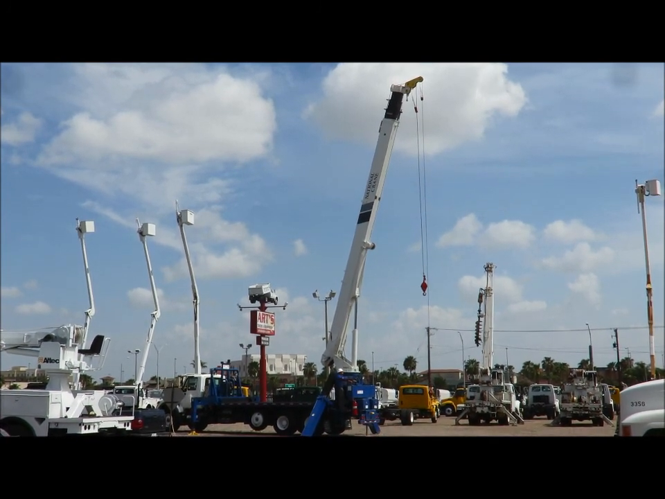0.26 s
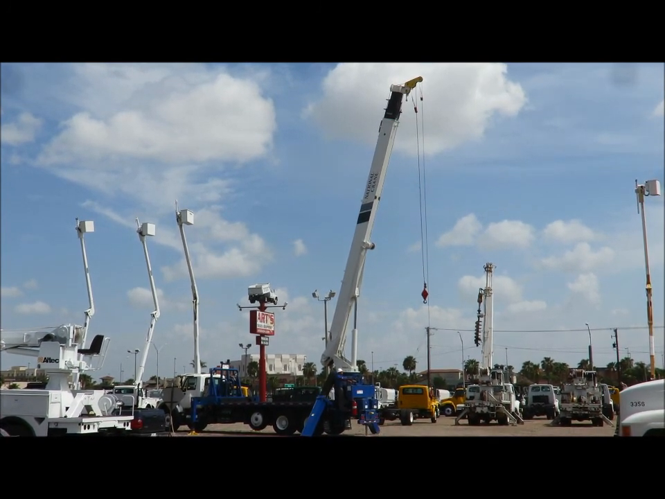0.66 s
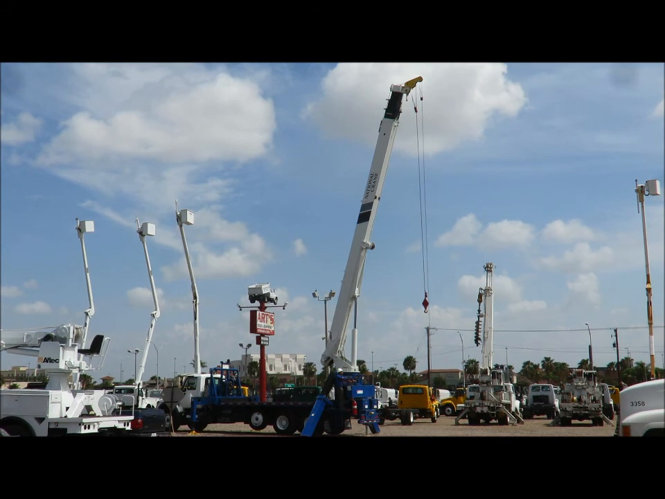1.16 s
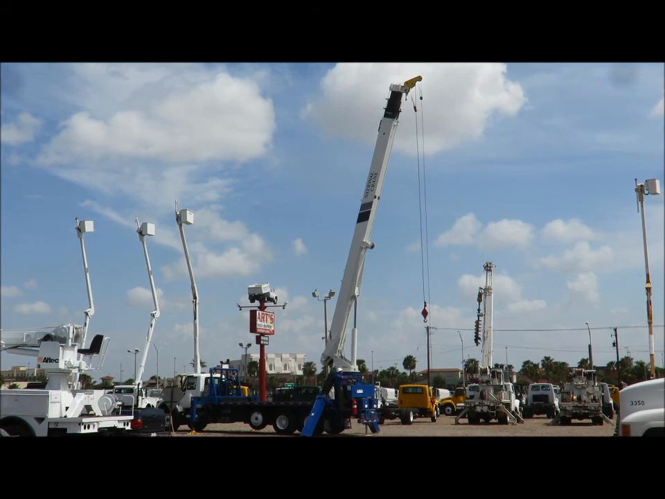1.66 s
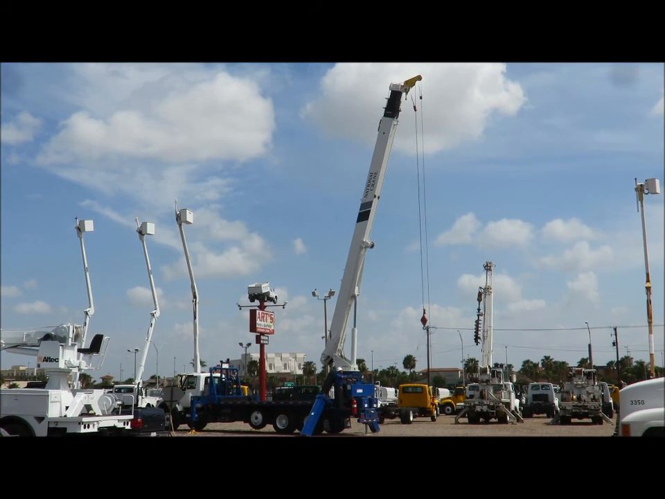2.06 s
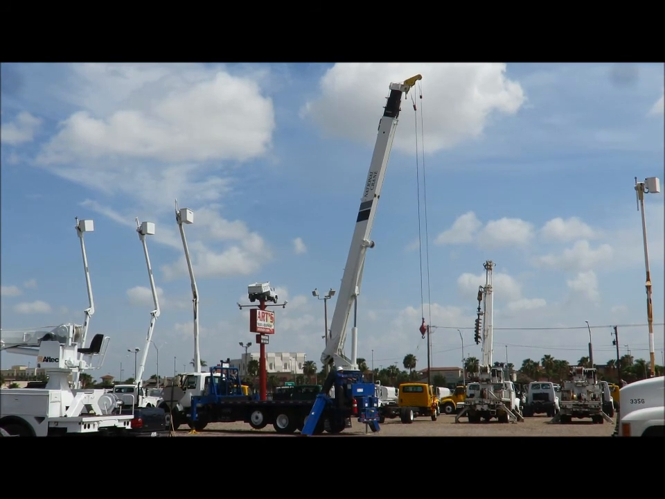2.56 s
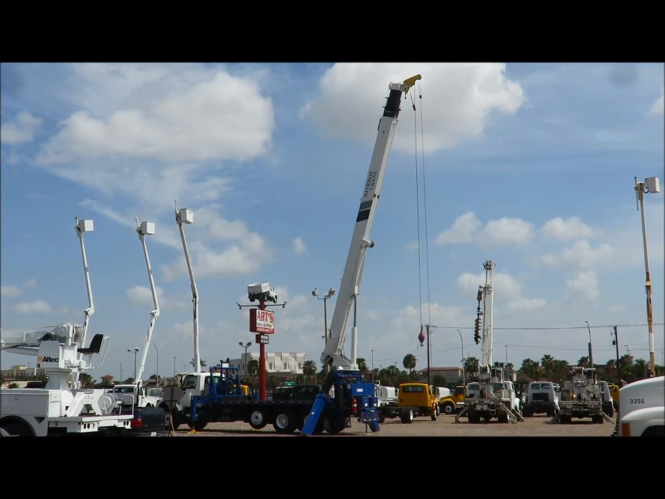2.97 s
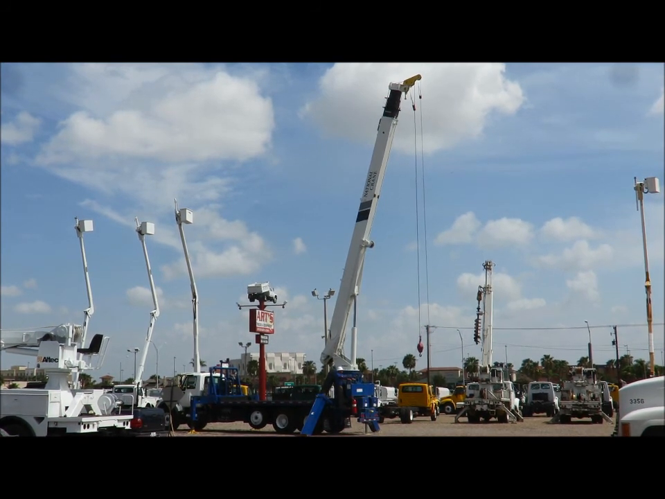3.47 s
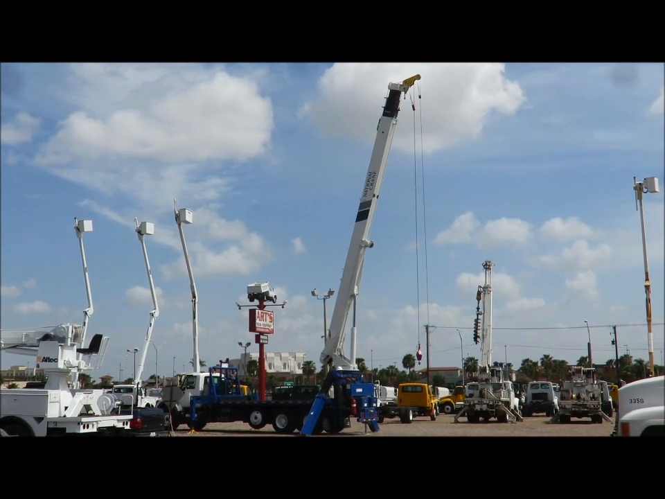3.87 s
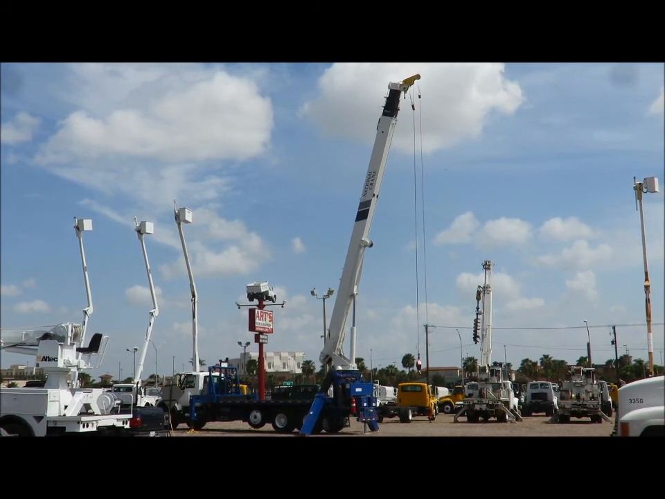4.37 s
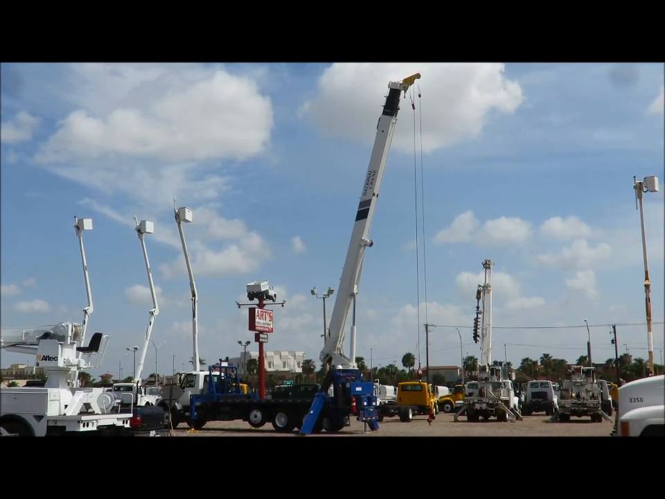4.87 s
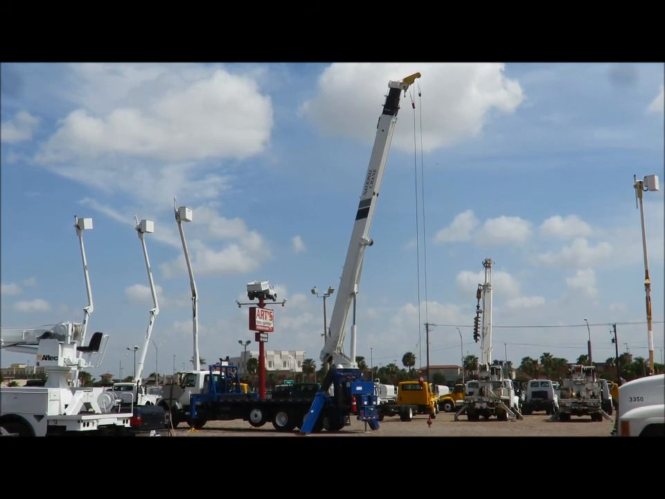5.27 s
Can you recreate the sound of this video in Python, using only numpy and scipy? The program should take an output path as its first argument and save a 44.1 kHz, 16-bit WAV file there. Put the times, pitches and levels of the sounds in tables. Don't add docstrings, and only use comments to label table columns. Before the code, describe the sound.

In an open yard, a crane truck runs at constant working speed: a hard, reedy pump whine, a lower winch-motor hum, thin gear whine and broad engine and fan roar. Wind thumps the bare stereo microphone at the start, calms in the middle, then returns with sharper knocks and rumble near the end.

```python
import sys
import numpy as np
from scipy import signal
from scipy.fft import rfft, irfft, next_fast_len
from scipy.io import wavfile
from scipy.ndimage import uniform_filter1d, map_coordinates

SR = 44100
rng = np.random.default_rng(int(sys.argv[2]) if len(sys.argv) > 2 else 0)


def generate_wav(signal):
    frames = np.transpose(np.atleast_2d(signal))
    scaled = np.clip(frames, -1, 1) * 32767
    pcm = np.round(scaled).astype(np.int16)
    wavfile.write(sys.argv[1], SR, pcm)


def ratio_of_db(decibels):
    return 10 ** (np.asarray(decibels, float) / 20)


N = 243255

# multiple, level/dB, shimmer/dB, phase blur/rad
PUMP_LOUD = [(7, -31, 0.65, 0.264), (13, -30, 0.14, 0.63), (21, -37, 1.5, .6), (14, -39, 1, 0.64)]
# multiple, level/dB
PUMP_WEAK = [(6, -46), (8, -54), (15, -57.5), (16, -49.5), (19, -50), (20, -48), (23, -74), (26, -49),
             (28, -48.5), (30, -50.5), (35, -50), (41, -48.5), (42, -58)]
# t/s, length/s, depth/dB, centre f/Hz
PUMP_FADES = [(0, 0.042, -6, 1600), (0.303, 0.64, -4, 1270), (.24, .05, -2.5, 684), (.7, 0.04, -22, 1120),
              (1.06, 0.1, -4, 684), (1.26, .05, 0, 2050), (1.357, 0.092, -16, 1110), (2.7, 0.92, -7, 2340),
              (3.9, .1, -1, 2400), (2.88, 0.064, -6, 1190), (4.235, 0.077, -2.5, 684),
              (4.348, 0.15, -9, 1380), (4.695, .1, -3, 684), (5.1, 0.32, -4.5, 1270),
              (5.327, 0.072, -15, 1500), (4.15, 0.091, -0.5, 1400), (5.45, .08, -0.5, 1270)]
# multiple, level/dB against the 13th
WINCH_ORDERS = [(7, -1.5), (13, 0), (14, 1.5), (15, -12), (16, -16), (20, -1.5), (21, -10.5), (22, -27),
                (27, -6), (28, -11), (38, -25)]
# t/s, length/s, depth/dB
WINCH_FADES = [
    (.3, 0.38, -4.5),
    (.92, 0.26, -13),
    (1.7, 0.23, -6),
    (2.8, 0.044, -4),
    (3.4, 0.12, -3),
    (3.708, .06, -15.5),
    (4.077, 0.13, -12),
    (4.81, 0.28, -5),
]
# t/s, length/s, depth/dB
MESH_FADES = [
    (0, 0.11, -6),
    (0.868, 0.16, -6.5),
    (1.616, .12, -6),
    (2.656, 0.12, -5.5),
    (3.1, 0.18, -1.5),
    (3.86, .12, -0.5),
    (4.2, 0.41, -2.5),
    (4.92, .1, -5.5),
    (5.26, .06, -3),
    (5.52, 0.059, 0),
]
# frequency as multiple of the firing rate, level/dB
LOW_TONES = [(2, 2.5), (3, 1), (4, -5), (10.3, -2)]
# t/s, length/s, level/dB
BOOM_SWELLS = [
    (.3, .2, 7.5),
    (1.2, 0.56, -3),
    (1.85, 0.072, 8),
    (2.15, 0.11, -9.5),
    (2.55, 0.29, 5.5),
    (3, .15, 4),
    (3.75, 0.23, 12),
    (4.09, 0.3, 7.5),
    (4.55, .25, 12.5),
    (5.52, 0.24, 14.5),
]
# f/Hz, level/dB (per Hz)
BLOCK_SPECTRUM = [(25, -36), (45, -32), (80, -12), (140, -1.5), (300, -4), (600, -1), (850, -5), (1050, -2),
                  (1205, -5.5), (1300, 0), (1720, -7.5), (2050, -5), (2600, -13.5), (3500, -31)]
# f/Hz, level/dB (per Hz)
FAN_SPECTRUM = [(900, -42), (1600, -9), (2200, -2.5), (3200, -0.5), (4500, -3.5), (6500, -22.5)]
# f/Hz, level/dB (per Hz)
HISS_SPECTRUM = [(2500, -16.5), (4200, -5), (5500, 0), (7500, -2), (10000, -3.5), (12500, -4),
                 (14500, -11.5), (15700, -1.5), (16200, -67)]
# f/Hz, correlation/1
TRUCK_ALIKE = [(100, .998), (500, .988), (1500, .985), (2200, .92), (3000, .84), (6000, .69), (9000, .7),
               (14000, .78)]
# f/Hz, phase/rad
PORT_LEAD = [(100, 0), (1500, .1), (2500, .36), (3500, .7), (5500, 1.4), (7600, 2.05), (10600, 2.9),
             (15000, 3.15)]
# t/s, level/dB
BREEZE = [
    (0, -32.5),
    (.5, -36.5),
    (.75, -41),
    (1.3, -36),
    (2, -45.5),
    (2.7, -40),
    (3.2, -35),
    (4.3, -29),
    (5, -30.5),
    (5.52, -29),
]
# t/s, length/s, level/dB
GUSTS = [(0.135, .1, 10), (0.301, 0.081, 7), (0.436, 0.067, 8.5), (1.001, 0.035, 6.5), (1.31, 0.033, 6),
         (1.488, .04, 7), (1.62, .06, 6.5), (1.72, .03, 1), (2.25, 0.081, 2), (2.87, .05, 9),
         (2.98, 0.036, 7.5), (3.208, 0.088, 7), (3.37, .04, 0.5), (3.55, .07, 2.5), (3.822, 0.03, 3),
         (4.6, 0.084, 7), (4.83, 0.17, 7), (5.13, 0.061, 4), (5.246, 0.027, -4), (5.31, .04, 4.5),
         (5.497, .03, 3)]
# centre t/s, peak level/dB, f/Hz, length/s
EDDIES = [(0.116, -9.5, 600, 0.0019), (0.1207, -9, 280, 0.0021), (.129, -13, 260, 0.0026),
          (0.17, -7, 337, .002), (.216, -20.5, 148, 0.0096), (.28, -15, 170, .012), (.33, -14, 257, 0.0056),
          (.427, -17, 191, 0.0055), (0.998, -18, 260, .005), (1.04, -28, 150, .008),
          (1.57, -24, 120, 0.011), (1.635, -23.5, 183, 0.0091), (1.717, -24.5, 100, 0.01084),
          (2.95, -18, 130, 0.0087), (3.135, -21, 135, 0.0074), (3.293, -21, 166, 0.01),
          (3.322, -18, 185, 0.0049), (3.423, -18, 135, .011), (3.821, -25, 140, 0.0075),
          (4.53, -17, 200, 0.0035), (4.557, -22, 170, .003), (4.612, -8, 230, .003),
          (4.624, -11, 261, 0.0018), (4.6314, -5, 287, 0.0029), (4.64, -3.5, 480, .0009),
          (4.706, -12.5, 210, .003), (4.778, -13, 257, 0.0052), (4.866, -12, 220, .0037),
          (4.91, -20, 170, 0.011), (5.493, -15, 300, 0.0036)]
# f/Hz, level/dB (per Hz)
BUFFET_SPECTRUM = [(100, -26), (170, -2.5), (270, -0.5), (400, -8.5), (800, -17), (1300, -24), (2500, -47)]
# f/Hz, level/dB (per Hz)
FLUTTER_SPECTRUM = [(55, -30), (90, 2), (135, 6), (175, 0.5), (260, -27)]
# f/Hz, level/dB (per Hz)
RUMBLE_SPECTRUM = [(18, -32), (30, -24), (50, 9.5), (75, 14.5), (110, -2), (160, -43)]
# f/Hz, correlation/1
WIND_ALIKE = [(30, .999), (60, .998), (130, .975), (290, .86), (600, .6), (1200, .3)]
# t/s, length/s, level/dB (positive closes)
TOP_OPENINGS = [
    (.62, .12, -3),
    (1.05, .4, -3),
    (1.55, .1, -3),
    (1.9, .3, -4.6),
    (2.78, .14, -4.8),
    (3.1, .15, -1.5),
    (3.5, .6, -1.8),
    (4.1, .1, -1.2),
    (4.65, .25, 1),
    (5.01, .025, -4.4),
]


def unit(x):
    return x / np.sqrt(np.mean(x ** 2) + 1e-20)


def along(points, hz):
    f, value = np.transpose(points)
    return np.interp(np.log(hz + 1), np.log(f + 1), value)


def wobble(rate):
    coarse = np.arange(0, N + 64, 64)
    knots = rng.standard_normal(400)
    return np.interp(np.arange(N), coarse, map_coordinates(knots, [coarse * rate / SR]))


def swells(rows, t):
    centre, length, db = np.transpose(rows)[:, :, None]
    return (db * np.exp(-((t - centre) / length) ** 2)).sum(axis=0)


def drifting(db, rows):
    t = np.arange(0, N / SR + .01, .005)
    return db + np.interp(np.arange(N) / SR, t, swells(rows, t))


def filtered(x, response):
    m = next_fast_len(N + 8192)
    return irfft(rfft(x, m) * response(np.fft.rfftfreq(m, 1 / SR)), m)[..., :N]


def tone(hz, db, shimmer_db, blur):
    phase = 2 * np.pi * (hz * np.arange(N) / SR + rng.random()) + blur * wobble(10)
    return np.sqrt(2) * ratio_of_db(db + shimmer_db * wobble(6)) * np.sin(phase)


def rush(spectrum, alike, patchy_db):
    z = signal.stft(rng.standard_normal((2, N)), nperseg=512)[2]
    patches = rng.standard_normal(z.shape[1:])
    patches = uniform_filter1d(patches, size=6, axis=0)
    patches = unit(uniform_filter1d(patches, size=16, axis=1))
    pair = signal.istft(z * ratio_of_db(patchy_db * patches), nperseg=512)[1][:, :N]

    def spread(hz):
        angle = np.arccos(np.clip(along(alike, hz), -1, 1)) / 2
        return ratio_of_db(along(spectrum, hz)) * [np.cos(angle), np.sin(angle)]

    mid, side = filtered(pair, spread)
    return unit(np.array([mid + side, mid - side]))


def pump():
    stroke_hz, fade_octaves = 97.67, 0.54
    out = np.zeros(N)
    for k, db, shimmer_db, blur in PUMP_LOUD:
        hz = k * stroke_hz
        fades = []
        for t, length, depth_db, centre_hz in PUMP_FADES:
            reach = np.exp(-(np.log2(hz / centre_hz) / fade_octaves) ** 2)
            fades.append((t, length, depth_db * reach))
        out += tone(hz, drifting(db, fades), shimmer_db, blur)
    for k, db in PUMP_WEAK:
        out += tone(k * stroke_hz, db, shimmer_db=4.0, blur=1.0)
    return out


def winch():
    motor_hz, mesh_hz = 77.36, 2484
    motor_db = drifting(-38, WINCH_FADES)
    mesh_db = drifting(-36, MESH_FADES)
    out = np.zeros(N)
    for k, db in WINCH_ORDERS:
        out += tone(k * motor_hz, motor_db + db, shimmer_db=3.0, blur=0.73)
    out += tone(mesh_hz, mesh_db, shimmer_db=1.5, blur=1.4)
    return out + tone(2 * mesh_hz, mesh_db - 11.5, shimmer_db=2.5, blur=0.61)


def engine():
    firing_hz = 43.4
    boom_db = drifting(-51.5, BOOM_SWELLS)
    boom = np.zeros(N)
    for k, db in LOW_TONES[:3]:
        boom += tone(k * firing_hz, boom_db + db, shimmer_db=3, blur=0.87)
    k, db = LOW_TONES[3]
    boom += tone(k * firing_hz, -39 + db, shimmer_db=3, blur=1.36)
    t = np.arange(N) / SR
    block = ratio_of_db(-28 + 0.276 * t) * rush(BLOCK_SPECTRUM, TRUCK_ALIKE, patchy_db=0.65)
    fan = ratio_of_db(-30.5 - 0.17 * t) * rush(FAN_SPECTRUM, TRUCK_ALIKE, patchy_db=-0.54)
    hiss = ratio_of_db(-29.5 - 0.11 * t) * rush(HISS_SPECTRUM, TRUCK_ALIKE, patchy_db=0.92)
    return boom + block + fan + hiss


def wind():
    breeze_db = -29
    t, db = np.transpose(BREEZE)
    over_db = drifting(np.interp(np.arange(N) / SR, t, db), GUSTS) - breeze_db
    buffet_db = breeze_db - 3.8 + 1.48 * over_db
    lumps = ratio_of_db(1.5 * wobble(25))
    buffet = ratio_of_db(buffet_db) * unit(lumps * rush(BUFFET_SPECTRUM, WIND_ALIKE, patchy_db=2.0))
    flutter_db = -35 + 0.65 * over_db + 1.8 * wobble(20)
    flutter = ratio_of_db(flutter_db) * rush(FLUTTER_SPECTRUM, WIND_ALIKE, patchy_db=2.9)
    rumble_db = -46 + over_db + 1.5 * wobble(20)
    rumble = ratio_of_db(rumble_db) * rush(RUMBLE_SPECTRUM, WIND_ALIKE, patchy_db=1.0)
    return eddies(buffet + flutter + rumble)


def eddies(out):
    t = np.arange(SR // 20) / SR
    sides = np.array([[1], [-1]])
    luck = rng.standard_normal((len(EDDIES), 2))
    for (centre, db, hz, length), (delay_luck, level_luck) in zip(EDDIES, luck):
        apart = .06 / hz * np.tanh(delay_luck) * sides
        u = t - 1.5 * length + apart
        level = ratio_of_db(db - 3.0 + 0.96 * level_luck * sides)
        thump = level * np.exp(-(u / length) ** 2) * np.sin(2 * np.pi * hz * u)
        start = round((centre - 1.5 * length) * SR)
        out[:, start:start + len(t)] += thump[:, :N - start]
    return out


def scene():
    truck = pump() + winch() + engine()
    sides = np.array([[1], [-1]])
    at_ports = filtered(truck, lambda hz: np.exp(.5j * along(PORT_LEAD, hz) * sides))
    return at_ports * ratio_of_db([[-.16], [.16]]) + wind()


def thin_stereo(dry):
    pair = np.array([dry[0] + dry[1], dry[0] - dry[1]]) / 2
    hz, t, z = signal.stft(pair, SR, nperseg=2048)
    band = np.sqrt(hz / 5.5).astype(int)
    hz = hz[:, None]
    starts = np.flatnonzero(np.diff(band, prepend=-1))
    power = np.add.reduceat(np.abs(z) ** 2, starts, axis=1)[:, band]
    share_db = 10 * np.log10((power[0] + 1e-20) / (power[1] + 1e-20))
    side_limit_db = np.interp(t, [3.6, 4.4], [-13, -22])
    keep_side = (-share_db > side_limit_db) | (hz > 3000)
    below_top = np.clip((11200 - hz) / 1500, 0, 9)
    top_limit_db = 3.4 + swells(TOP_OPENINGS, t) - 5 * below_top ** 2 + 9 * (hz > 15200)
    keep_mid = share_db - share_db.mean(axis=1, keepdims=True) > top_limit_db
    mid, side = signal.istft(z * np.array([keep_mid, keep_side]), SR, nperseg=2048)[1][:, :N]
    return np.array([mid + side, mid - side])


def roll_off(x):
    return signal.sosfilt(signal.butter(12, 15270, fs=SR, output="sos"), x)


def record(dry):
    mix = thin_stereo(dry)
    return roll_off(mix)


dry = scene()
out = record(dry)
generate_wav(out)
```